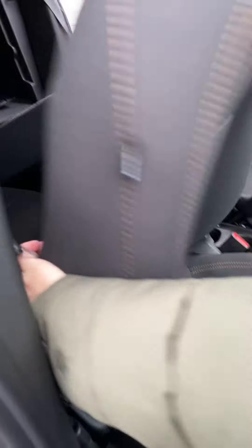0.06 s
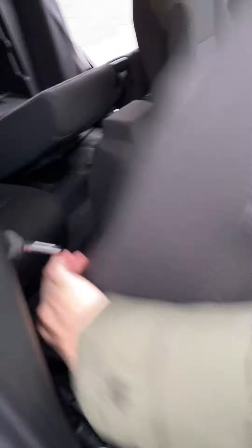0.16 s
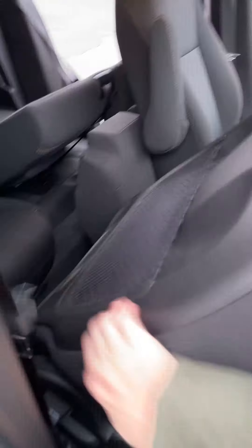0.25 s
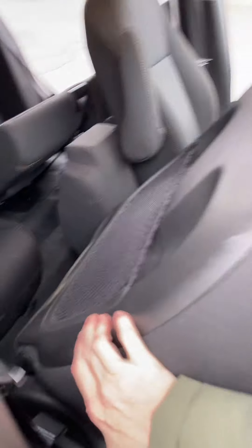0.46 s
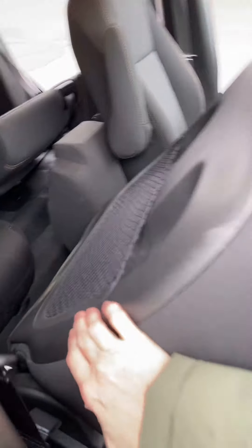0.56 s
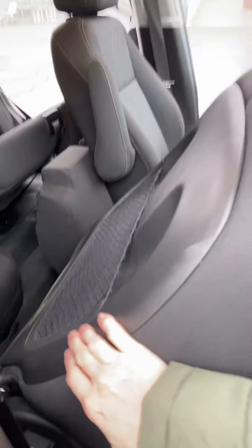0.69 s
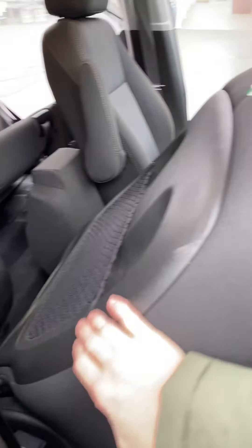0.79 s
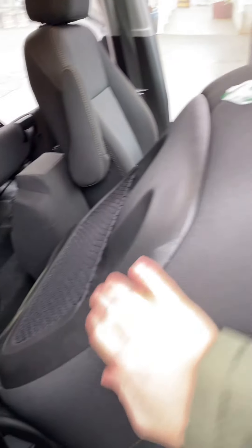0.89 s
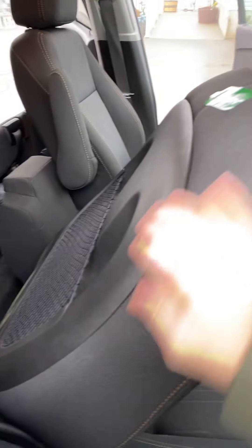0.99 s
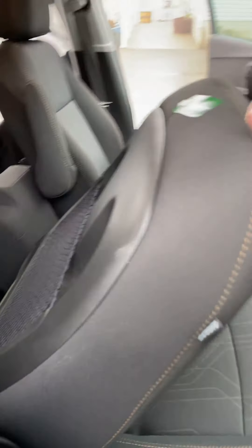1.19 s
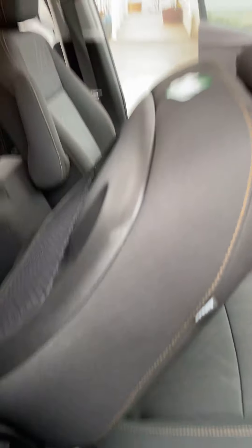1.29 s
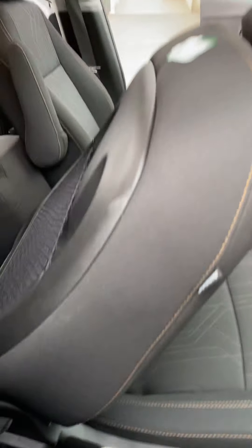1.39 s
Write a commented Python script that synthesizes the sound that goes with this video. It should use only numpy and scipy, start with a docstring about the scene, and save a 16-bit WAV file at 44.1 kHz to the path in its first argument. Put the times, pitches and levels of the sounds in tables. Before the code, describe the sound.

Car seat back clunks down and settles with muffled knocks over a low rumble.

```python
"""Folding a car seat forward

Inside a parked car a seat back swings on a faintly groaning hinge and lands with a double clunk that
rings its frame and steel catch. It rebounds softly on the cushion, and the mechanism settles in a run of
dull knocks and one light tick. Cloth slides over the upholstery; the cabin holds a low rumble."""
import sys
import numpy as np
from scipy import signal
from scipy.fft import rfft, irfft, next_fast_len
from scipy.io import wavfile
from scipy.ndimage import map_coordinates

SR = 44100
rng = np.random.default_rng(int(sys.argv[2]) if len(sys.argv) > 2 else 0)


def transcribe(u):
    """Save the signal u as a 16-bit wav file named by the first command-line argument.

    u: samples, shape (n,) or (channels, n), limited to [-1, 1]; the rate is SR.
    q: integer samples, one column per channel.
    """
    v = np.clip(np.atleast_2d(u).T, -1, 1)
    q = np.round(v * 32767).astype(np.int16)
    wavfile.write(sys.argv[1], SR, q)


N = 63945


def amp(db):
    """Decibels to gain."""
    return 10 ** (np.asarray(db) / 20)


def unit(x):
    """Scale to rms 1."""
    return x / np.sqrt(np.mean(x ** 2) + 1e-20)


def along(points, hz):
    """Read a curve of (f/Hz, value) points on a log frequency axis."""
    f, v = np.transpose(points)
    return np.interp(np.log(hz + 1), np.log(f + 1), v)


def add(track, s, sound):
    """Mix a sound into the track at s seconds."""
    part = track[max(0, round(s * SR)):][:len(sound)]
    part += sound[:len(part)]


def filtered(x, response):
    """Equalise x with a gain given as a function of frequency."""
    size = next_fast_len(len(x) + SR // 4)
    return irfft(rfft(x, size) * response(np.fft.rfftfreq(size, 1 / SR)), size)[:len(x)]


def noise(spectrum, size):
    """Noise of rms 1, coloured by (f/Hz, level/dB) points."""
    return unit(filtered(rng.standard_normal(size), lambda hz: amp(along(spectrum, hz))))


def band(hz, width_hz, size):
    """Noise of rms 1 in one resonance."""
    return unit(filtered(rng.standard_normal(size), lambda f: 1 / (1 + ((f - hz) / width_hz) ** 2)))


def wobble(rate):
    """A smooth random curve with rate knots a second."""
    return map_coordinates(rng.standard_normal(N // 100), [np.arange(N) * rate / SR])


def fade(t, t60):
    """Exponential decay, 60 dB down after t60 seconds."""
    return np.exp(-np.log(1000) * t / t60)


def dying(x, t60s):
    """Let each frequency of x die at its own speed, set by (f/Hz, t60/s) points."""
    hz, t, spectra = signal.stft(x, SR, nperseg=256)
    decay = amp(-60 * t / along(t60s, hz)[:, None])
    return signal.istft(spectra * decay, SR, nperseg=256)[1][:len(x)]


def causal(gain):
    """The minimum-phase response with this gain, by folding the cepstrum."""
    cepstrum = irfft(np.log(np.maximum(gain, 1e-6)))
    half = len(cepstrum) // 2
    cepstrum[1:half] *= 2
    cepstrum[half + 1:] = 0
    return np.exp(rfft(cepstrum))


def ring(modes, blows, attack_s):
    """Damped modes struck by (t/s, level/dB) blows; loose trim makes each mode's phase wander."""
    wander_rad = 0.3
    out, t = np.zeros(N), np.arange(SR // 2) / SR
    for hz, db, t60 in modes:
        tone = fade(t, t60) * (1 - np.exp(-t / attack_s)) * np.exp(2j * np.pi * hz * t)
        mode = np.zeros(N, complex)
        for s, blow_db in blows:
            add(mode, s, amp(db + blow_db) * tone)
        out += (mode * np.exp(1j * wander_rad * wobble(rate=45))).imag
    return out


def cabin():
    """The bed: a low rumble that grows once the cabin is shaken, and the even hiss of the air outside."""
    # colour of the rumble: f/Hz, level/dB
    rumble_eq = [(22, -60), (36, -18), (55, 0.5), (75, 1.5), (110, -3.5), (170, -3.5), (250, -11.5),
                 (450, -21), (900, -30), (2000, -49)]
    # colour of the air: f/Hz, level/dB
    air_eq = [(25, -33), (100, 1), (500, 3.5), (1000, -3.5), (1500, -4), (2200, -11.5), (4000, -16),
              (8000, -25.5), (14000, -42), (16000, -41)]
    # fader ride of the rumble: t/s, level/dB
    shake = [(0, -47), (.2, -36), (.45, -35.5), (.95, -37), (1.1, -38.5), (1.3, -35.5), (1.45, -39)]
    rumble_db, air_db = np.interp(np.arange(N) / SR, *np.transpose(shake)), -46.5
    return amp(rumble_db) * noise(rumble_eq, N) + amp(air_db) * noise(air_eq, N)


def cloth():
    """Upholstery rubs unevenly as the seat is pushed, and a sleeve swishes with each move of the arm."""
    # colour of the rubbing: f/Hz, level/dB
    rub_eq = [(25, -35), (100, 10.5), (300, 2), (800, 7.5), (2000, 0), (3200, -3), (5000, -4), (8000, -14),
              (14000, -43), (16000, -33)]
    # fader ride of the rubbing: t/s, level/dB
    slide = [(0, -46.5), (.11, -46), (.2, -41.5), (.38, -50.5), (0.501, -47), (.62, -52.5), (.72, -52.5),
             (.8, -50), (.87, -55), (.94, -51), (1.1, -57.5), (1.25, -73), (1.45, -58)]
    # fine hiss of the sleeve's weave: f/Hz, level/dB
    swish_eq = [(3000, -35), (8000, -3), (11500, 1), (14000, 1), (16000, -20)]
    # sleeve strokes: middle t/s, half length/s, top level/dB
    strokes = [(0.05, 0.042, -58), (0.198, 0.044, -58), (0.508, 0.043, -61), (1.09, 0.1, -63),
               (1.3, 0.037, -71)]
    t = np.arange(N) / SR
    flutter_db = 0.9 * wobble(rate=30)
    rub = amp(np.interp(t, *np.transpose(slide)) + flutter_db) * noise(rub_eq, N)
    swells = sum(amp(db) * np.exp(-0.5 * ((t - s) / half) ** 2) for s, half, db in strokes)
    return rub + swells * noise(swish_eq, N)


def hinge():
    """Friction in the hinge hums in one mode of the frame while the back swings."""
    # groans on the way down and on the rebound: t/s, length/s, level/dB
    swings = [(0.019, 0.14, -40), (0.317, 0.072, -25.5)]
    out = np.zeros(N)
    for s, length_s, db in swings:
        size = round(length_s * SR)
        groan = band(hz=314, width_hz=14, size=size)
        add(out, s, amp(db) * groan * signal.windows.tukey(size, 0.5))
    return out


def tick():
    """A light metal part touches once."""
    out, t = np.zeros(N), np.arange(SR // 8) / SR
    touch = band(hz=4820, width_hz=250, size=len(t)) * fade(t, t60=0.02)
    add(out, s=0.6385, sound=amp(-43.5) * touch)
    return out


def bumps():
    """The padded back sways against the cushion for a few low cycles."""
    # soft rebounds: t/s, envelope peak level/dB
    rebounds = [(0.098, -31.5), (0.346, -14.5), (0.397, -19.5), (0.59, -22.5), (0.838, -17)]
    sway_hz, rise_s = 89.7, 0.0077
    out, t = np.zeros(N), np.arange(SR // 4) / SR
    envelope = t / rise_s * np.exp(1 - t / rise_s)
    for s, db in rebounds:
        add(out, s, amp(db) * envelope * np.sin(2 * np.pi * sway_hz * t))
    return out


def knocks():
    """Padded knocks cross the frame as bending waves, so each falls in pitch; the cabin answers low."""
    # knocks in the mechanism: t/s, peak level/dB, treble cutoff f/Hz
    hits = [(0.0172, -24, 915), (.0235, -24, 470), (0.112, -25, 430), (.401, -23.5, 300),
            (.600, -22.5, 454), (0.6151, -18, 390), (0.636, -29, 340), (0.716, -23.5, 520),
            (.720, -21.5, 238), (0.7464, -10, 663), (0.7617, -19, 308), (0.7766, -20.5, 670),
            (.779, -15, 238), (0.7987, -19, 520), (0.811, -23.5, 224), (0.827, -18.5, 398),
            (.839, -20.5, 275), (0.8477, -19, 450), (0.861, -27, 510), (0.874, -31, 167),
            (0.8859, -24.5, 352), (.914, -28.5, 250)]
    # reverb time of the cabin: f/Hz, t60/s
    cabin_t60 = [(80, 0.097), (300, 0.21), (1000, .06), (8000, 0.033)]
    travel_s = 0.003304  # for a 300 Hz bending wave; higher waves arrive sooner
    low_cut_hz, tilt, cutoff_order = 99.6, 0.83, 5.54
    reverb_db, reverb_top_hz = -8, 260
    out, size = np.zeros(N), SR // 4 * 2
    hz = np.fft.rfftfreq(size, 1 / SR) + 1
    dispersion = np.exp(-4j * np.pi * travel_s * np.sqrt(300 * hz))
    body = hz ** -tilt / np.sqrt(1 + (low_cut_hz / hz) ** 8)
    muffle = signal.butter(2, reverb_top_hz, fs=SR, output="sos")
    for s, db, cutoff_hz in hits:
        padded = body / np.sqrt(1 + (hz / cutoff_hz) ** (2 * cutoff_order))
        knock = irfft(causal(padded) * dispersion)[:size // 4]
        knock = amp(db) * knock / np.abs(knock).max()
        tail = dying(rng.standard_normal(size), cabin_t60)
        tail = signal.sosfilt(muffle, tail / np.linalg.norm(tail))
        add(out, s - travel_s, knock)
        add(out, s, amp(reverb_db) * signal.fftconvolve(knock, tail))
    return out


def clunk():
    """The back hits its stop: frame and catch ring, with a crack, a plastic clack and clashing parts."""
    # blows on the stop: t/s, frame level/dB, catch level/dB, impact level/dB, clack f/Hz
    blows = [(0.2277, -31, -17, -8.5, 1570), (0.2296, 7.5, -12.5, 5.5, 857), (0.241, -6.5, -28, 0, 780),
             (0.2526, 2, 2, 3, 1103), (0.278, -24, -17, -12.5, 630)]
    # modes of frame and cabin: f/Hz, relative level/dB, t60/s
    frame_modes = [(84.2, -13.5, 0.17), (151, -11, .18), (179.3, -9, .12), (213, -7, 0.089),
                   (252, -13, .17), (307.5, -11, .2), (347.1, -18, .16), (391.8, -16, 0.13),
                   (471.5, -23, .2), (521.4, -25, 0.2), (647, -21, 0.061)]
    # modes of the steel catch: f/Hz, relative level/dB, t60/s
    catch_modes = [(814, -16.5, 0.051), (910, -23, 0.03), (1083, -21.5, 0.076), (1275, -33, 0.052),
                   (1740, -24, 0.075), (2023, -20.5, 0.044), (2434, -25.5, 0.046), (3335, -34, 0.055),
                   (3150, -26.5, 0.045), (3860, -46, 0.11)]
    # colour of the clash of loose parts: f/Hz, level/dB
    clash_eq = [(20, -50), (70, -24), (160, 9.5), (400, 5.5), (1000, -10), (2000, -18.5), (3000, -31),
                (5000, -36), (8000, -41), (15000, -53.5)]
    # decay of the clash: f/Hz, t60/s
    clash_t60 = [(100, 0.17), (400, 0.21), (1000, 0.13), (3000, 0.15), (10000, 0.24)]
    # colour of the crack: f/Hz, level/dB
    crack_eq = [(20, -50), (90, -4), (400, -9), (900, -13), (1400, -10), (2000, -5.5), (3400, -19.5),
                (5000, -27), (8000, -50), (15000, -36)]
    contact_s, clack_db, clack_t60_s = 0.0012, -4, 0.02
    rows, t = np.array(blows), np.arange(SR // 2) / SR
    # only the lowest mode of each part sounds
    out = ring(frame_modes[:1], rows[:, [0, 1]], attack_s=0.00067)
    out += ring(catch_modes[:1], rows[:, [0, 2]], attack_s=0.0009)
    onset = 1 - np.exp(-t / contact_s)
    for s, _, _, impact_db, clack_hz in blows:
        clash = amp(-11) * dying(noise(clash_eq, len(t)), clash_t60)
        crack = amp(-13) * noise(crack_eq, len(t)) * fade(t, t60=0.019)
        add(out, s, amp(impact_db) * onset * (clash + crack))
        out += ring([(clack_hz, clack_db, clack_t60_s)], [(s, impact_db)], attack_s=0.001)
    return out


def scene():
    """All layers close up, in mono."""
    return (hinge() + clunk() + bumps() + knocks() + tick() + cloth() + cabin())[None]


def record(dry):
    """A soft clip rounds off the highest peaks, then a brick-wall low-pass trims the top."""
    ceiling, knee, top_hz = 0.92, 13, 15850
    rounded = dry[0] / (1 + np.abs(dry[0] / ceiling) ** knee) ** (1 / knee)
    return filtered(rounded, lambda hz: hz < top_hz)[None]


dry = scene()
out = record(dry)
transcribe(out)
```